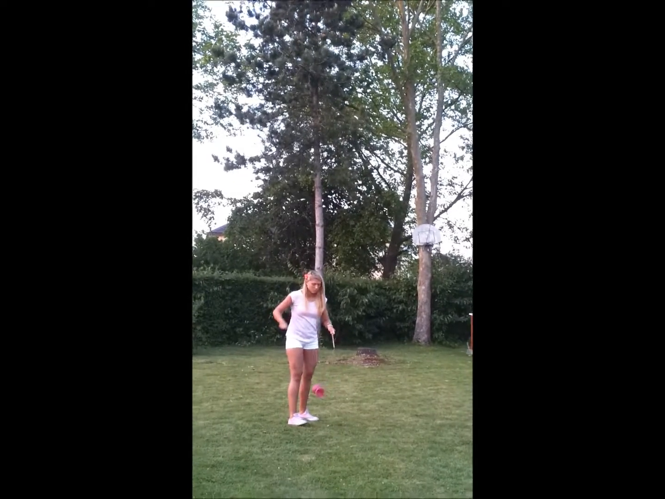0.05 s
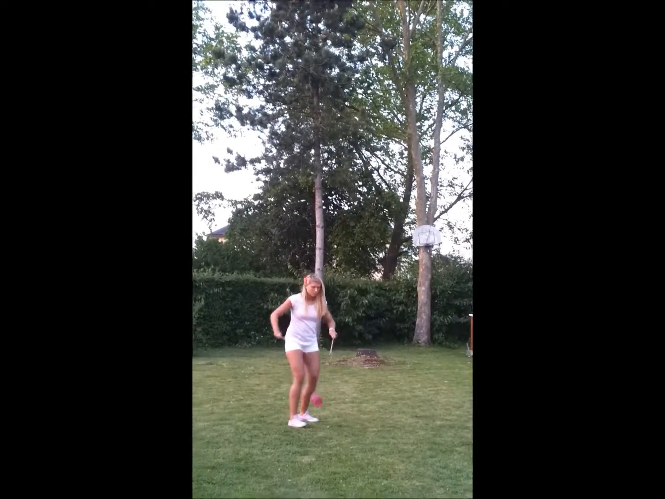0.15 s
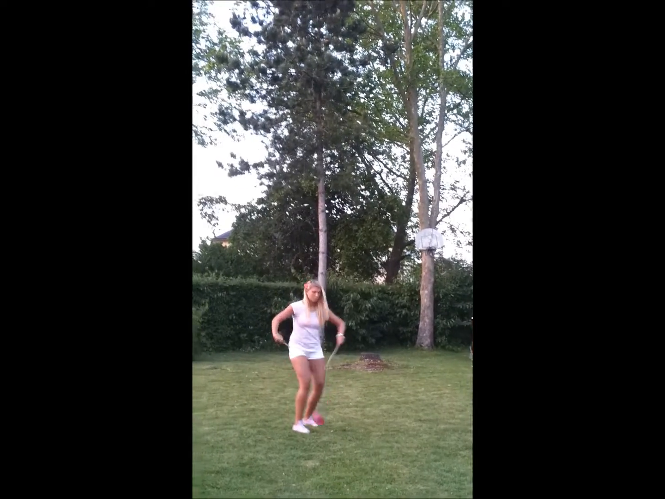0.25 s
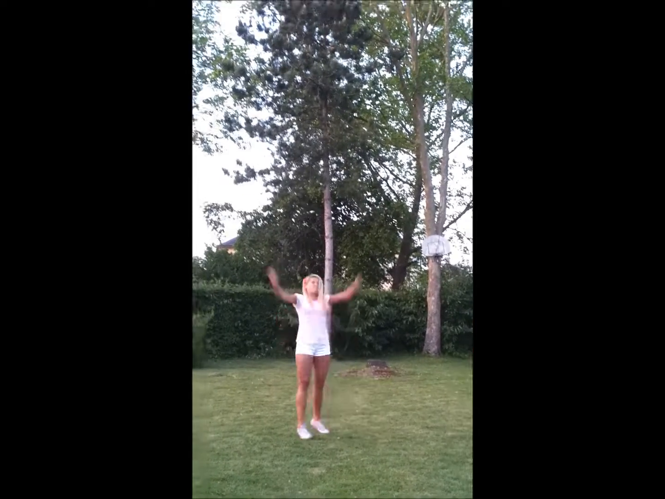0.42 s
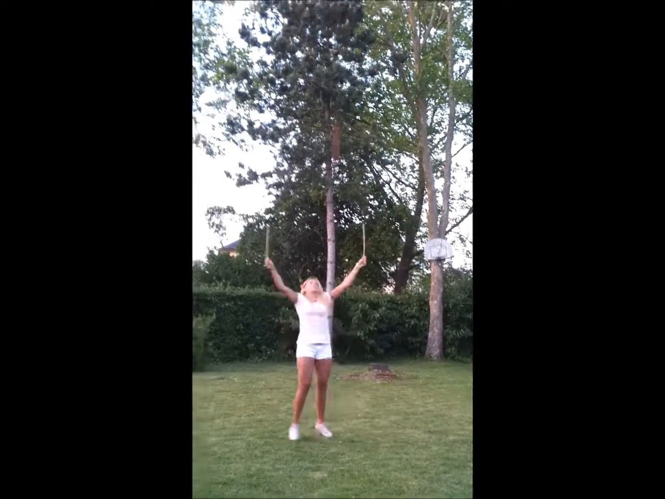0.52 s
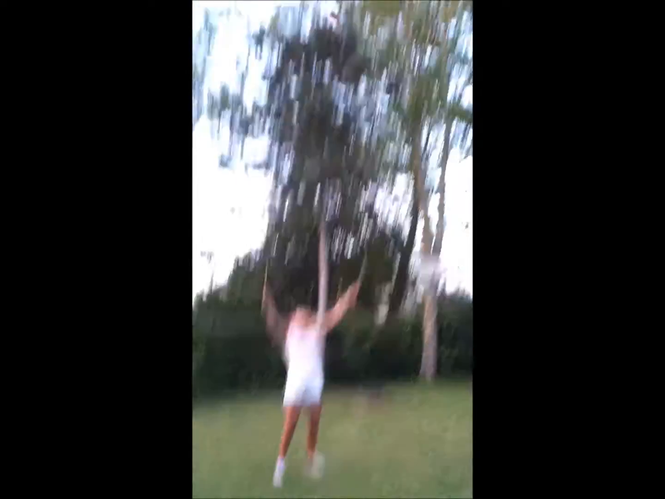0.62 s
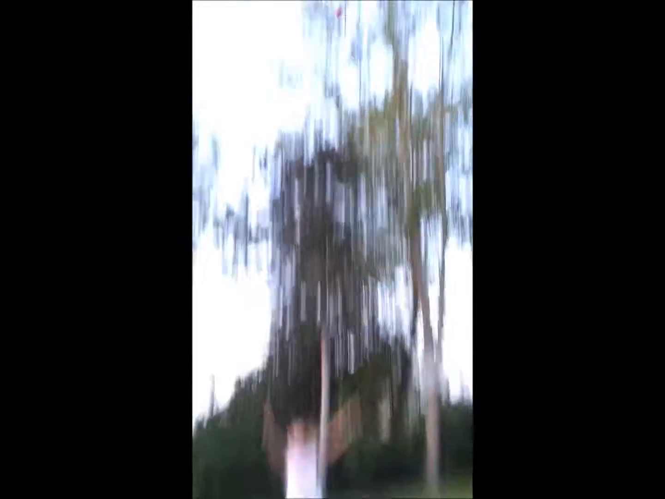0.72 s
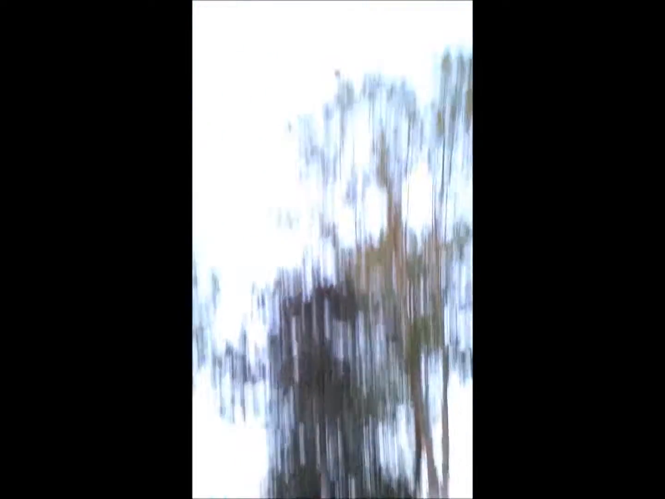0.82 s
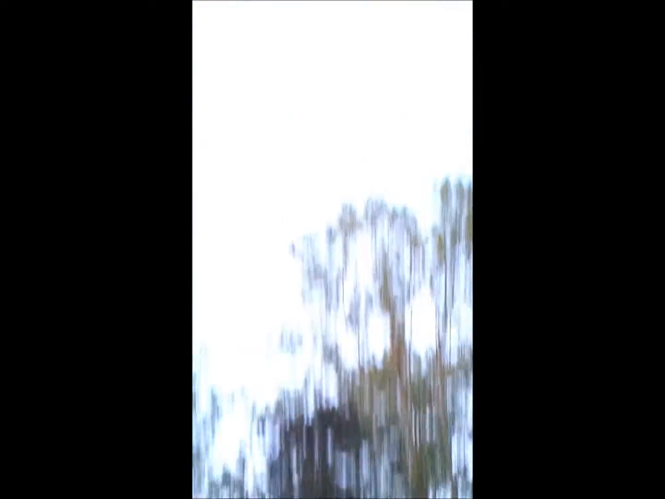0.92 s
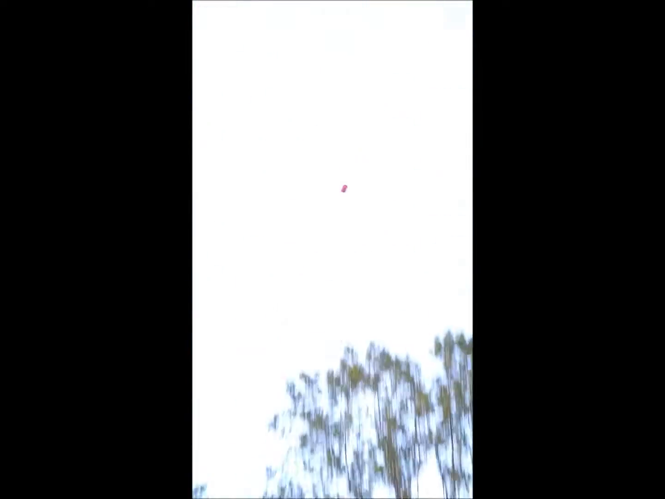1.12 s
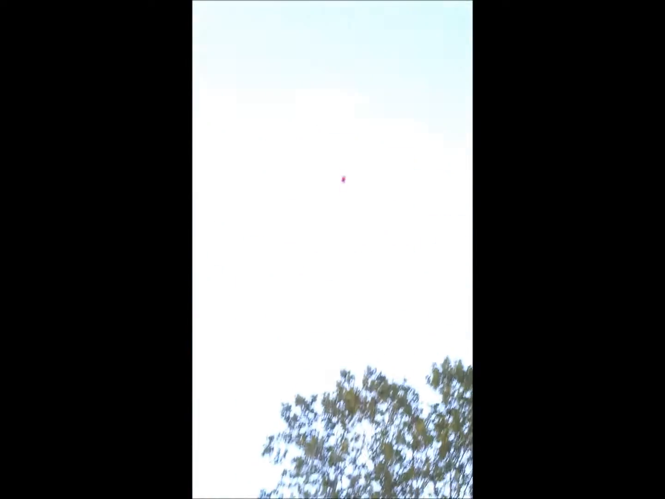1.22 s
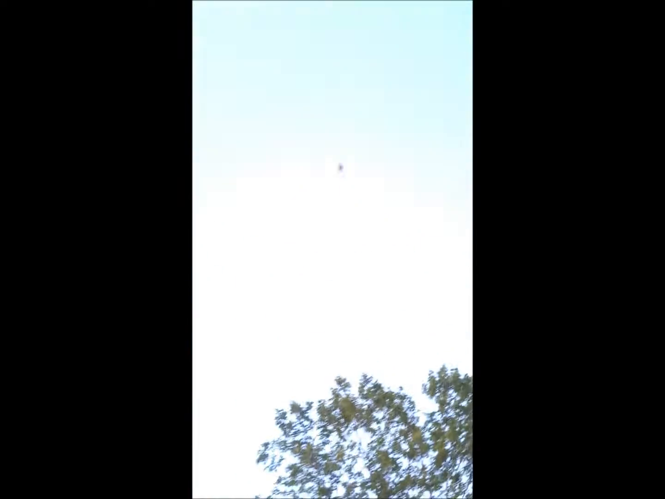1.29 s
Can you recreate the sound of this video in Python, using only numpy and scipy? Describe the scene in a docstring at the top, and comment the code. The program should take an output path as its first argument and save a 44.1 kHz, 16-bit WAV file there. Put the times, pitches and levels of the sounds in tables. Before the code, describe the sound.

A small bird whistles falling notes in a garden, with a brief knock on the microphone.

```python
"""A small warbler sings in a garden: evenly spaced whistles that fall in pitch, two kinds in turn,
scattered back by the trees. A second bird slurs faintly far off, over a soft wash of outdoor noise.
Close to the left microphone port a hand knocks on the casing, makes it tick, and slides over it:
the impacts excite damped vibrations, and the friction of the skin makes a thin hiss."""
import sys
import numpy as np
from scipy import signal
from scipy.fft import rfft, irfft
from scipy.io import wavfile
from scipy.ndimage import uniform_filter1d

SR = 44100
rng = np.random.default_rng(int(sys.argv[2]) if len(sys.argv) > 2 else 0)


def file_out(sig):
    """Save sig as 16-bit WAV at sys.argv[1]."""
    # one column per channel
    cols = np.atleast_2d(sig).T
    # limit, then scale
    lim = np.clip(cols, -1, 1)
    pcm = np.round(lim * 32767).astype(np.int16)
    wavfile.write(sys.argv[1], SR, pcm)


N = 59535
TIME = np.arange(N) / SR


def from_db(db):
    """Decibels to amplitude ratio."""
    return 10 ** (np.asarray(db) / 20)


def unit_rms(x):
    """Normalisation to an rms of 1."""
    return x / np.sqrt(np.mean(x ** 2) + 1e-20)


def in_time(rows):
    """Linear interpolation of a curve at every sample."""
    return np.interp(TIME, *np.transpose(rows))


def at_hz(points, hz):
    """Interpolation on a log-frequency axis."""
    point_hz, value = np.transpose(points)
    return np.interp(np.log(hz + 1), np.log(point_hz), value)


def pan(db):
    """Left and right gains for a level difference, left minus right."""
    return from_db(np.array([[.5], [-.5]]) * db)


def drift(rate_hz):
    """Random fluctuation: low-passed noise, rms 1."""
    pole = np.exp(-2 * np.pi * rate_hz / SR)
    return unit_rms(signal.lfilter([1], [1, -2 * pole, pole * pole], rng.standard_normal(2 * N))[N:])


def noise(spectrum):
    """Spectral shaping of two uncorrelated noise channels, rms 1."""
    gain = from_db(at_hz(spectrum, np.fft.rfftfreq(N, 1 / SR)))
    return unit_rms(irfft(rfft(rng.standard_normal((2, N))) * gain, N))


def decay(start, t60):
    """Exponential decay from a sudden onset, by 60 dB in t60 seconds."""
    return (TIME >= start) * from_db(-60 * np.clip((TIME - start) / t60, 0, 2))


def resonate(x, hz, width_hz):
    """A two-pole resonance with a peak gain of 1."""
    radius = np.exp(-np.pi * width_hz / SR)
    feedback = [1, -2 * radius * np.cos(2 * np.pi * hz / SR), radius ** 2]
    return signal.lfilter(np.array([1, 0, -1]) * (1 - radius ** 2) / 2, feedback, x + 1e-18)


def rolloff(x, kind, hz):
    """A second-order low-pass or high-pass filter."""
    return signal.sosfilt(signal.butter(2, hz, kind, fs=SR, output="sos"), x + 1e-18)


# Each row: frequency in Hz, relative spectral density in dB.
WASH_SPECTRUM = [(25, -19), (55, -6), (90, -5), (170, 1.5), (400, 4), (800, 1), (1300, 1.5), (2100, 0.5),
                 (2900, -8), (4200, -8.5), (6000, -12.5), (10000, -15.5), (14500, -17.5)]
# Each row: time in seconds, level in dB.
WASH_LEVEL = [(0, -49), (.3, -46.5), (.62, -47), (.85, -48), (1.05, -49.5), (1.15, -46.5), (1.35, -53)]
# Each row: frequency in Hz, left minus right in dB.
WASH_BALANCE = [(50, 7), (150, 5.5), (500, 1.5), (2000, -0.5), (12000, 1)]
# Each row: frequency in Hz, correlation between the channels.
WASH_CORRELATION = [(50, 0.4), (200, .45), (800, 0.43), (3000, 0), (12000, 0.63)]


def outdoor_wash():
    """Partial coherence: distant sound reaches the two channels only partly alike."""
    hz = np.fft.rfftfreq(N, 1 / SR)
    mid, side = rfft(noise(WASH_SPECTRUM))
    correlation = at_hz(WASH_CORRELATION, hz)
    spectra = np.sqrt(1 + correlation) * mid + np.sqrt(1 - correlation) * side * [[1], [-1]]
    wash = unit_rms(irfft(spectra * pan(at_hz(WASH_BALANCE, hz)), N))
    return wash * from_db(in_time(WASH_LEVEL) + .5 * drift(5))


# Each row: centre frequency in Hz, resonator bandwidth in Hz, level in dB.
HUM_BANDS = [(766, 180, -48.5), (936, 225, -49.5)]
# Each row: time in seconds, gain on both bands in dB.
HUM_GAIN = [(0, -4.5), (.4, -2), (.68, -3), (.95, -9), (1.35, -9)]


def hum():
    """Resonance narrows noise into bands, heard as a faint wavering hum."""
    out = 0
    for hz, width_hz, db in HUM_BANDS:
        band = resonate(rng.standard_normal((2, N)), hz, width_hz)
        out += from_db(db) * unit_rms(resonate(band, hz, width_hz))
    return out * from_db(in_time(HUM_GAIN))


# Near and far foliage. Each row: relative level in dB, 60 dB decay time in seconds.
FOLIAGE = [(0.5, 0.15), (-5, 0.67)]


def tree_echoes(x):
    """Scattering: trunks and leaves return countless weak echoes, different in each channel."""
    envelope = sum(from_db(db) * decay(0, t60) for db, t60 in FOLIAGE)
    response = unit_rms(rng.standard_normal((2, N)) * envelope) / np.sqrt(N)  # unit energy
    return signal.fftconvolve(rolloff(response, "low", hz=14800), x[None], axes=1)[:, :N]


# Each row: start and duration in seconds, first and last pitch in Hz, peak level in dB.
SLURS = [(0.105, .05, 3850, 3780, -58), (0.865, .05, 4020, 3960, -54), (0.955, .06, 3000, 2900, -56),
         (1.005, .05, 2550, 2200, -56), (1.245, .10, 2370, 1880, -52)]


def far_bird(echo_db=-11):
    """Frequency glides: soft pure tones swell and fade as they fall, and echo off the trees."""
    song = 0
    for start, duration, high_hz, low_hz, db in SLURS:
        progress = np.clip((TIME - start) / duration, 0, 1)
        hz = low_hz + (high_hz - low_hz) * (1 - progress) ** 1.49
        song += from_db(db) * np.sin(np.pi * progress) * np.sin(2 * np.pi * np.cumsum(hz) / SR)
    return song + from_db(echo_db) * tree_echoes(song)


# Each row: time in seconds, level in dB.
SLIDE_LEVEL = [(0, -71), (.15, -66.5), (.22, -48.5), (.33, -62), (.52, -53.5), (.8, -53), (1.05, -56),
               (1.2, -60), (1.35, -68.5)]
# Each row: start in seconds, level in dB, 60 dB decay time in seconds.
SCUFFS = [(0.154, -47, .025), (0.2145, -44, .015), (0.5145, -34, .035), (0.529, -41, .02),
          (0.9563, -37, .006), (1.086, -37, .015), (1.185, -43, .03)]
# Each row of both spectra: frequency in Hz, relative spectral density in dB.
SLIDE_SPECTRUM = [(200, -18), (2000, -6.5), (5500, -19), (8000, -2), (9900, 0.5), (10900, 2.5), (12000, -7),
                  (14500, -14.5)]
SCUFF_SPECTRUM = [(60, -48), (300, -4), (2000, 2.5), (5000, -6.5), (8000, -1.5), (11000, 2), (14500, -15)]


def sliding_hand():
    """Friction: skin rubs the casing with a thin grainy hiss and a few brief scuffs."""
    slide = from_db(in_time(SLIDE_LEVEL) + 1.1 * drift(90)) * noise(SLIDE_SPECTRUM)
    scuff_envelope = sum(from_db(db) * decay(start, t60) for start, db, t60 in SCUFFS)
    return slide * pan(db=6.5) + scuff_envelope * noise(SCUFF_SPECTRUM) * pan(db=5)


# Each row: start in seconds, peak level in dB, frequency in Hz, rise time in seconds,
# left minus right in dB.
TICKS = [(0.9564, -25, 9800, 0.00025, 16), (1.0848, -27, 8480, 0.00039, -2), (1.0865, -23, 8080, 0.0003, 3),
         (1.0959, -33, 11300, 0.00012, 21)]


def casing_ticks():
    """Modal ringing: each tiny contact excites one high mode for about a millisecond."""
    out = 0
    for start, db, hz, rise_s, pan_db in TICKS:
        age = np.maximum(TIME - start, 0)
        rise = np.minimum(age / rise_s, 20)
        envelope = from_db(db) * rise * np.exp(1 - rise)
        out += pan(pan_db) * envelope * np.sin(2 * np.pi * hz * age)
    return out


# Each row: start in seconds; the thump's level in dB, frequency in Hz and 60 dB decay time in
# seconds; the crack's level in dB and low-pass corner in Hz. Levels are before filtering.
KNOCKS = [(0.2066, -24, 380, 0.005, -19, 3040), (0.2366, -9, 404, 0.005, -10, 12200),
          (0.2530, 4.5, 575, 0.0092, -9, 3000), (0.29, -11, 261, 0.015, -24, 2000)]
# Each row: frequency in Hz, relative spectral density in dB.
CRACK_SPECTRUM = [(40, -47), (150, 5.5), (400, -28), (1400, -1.5), (2300, -2), (3000, 0), (4200, -18.5),
                  (6000, -8.5), (8500, -4.5), (11000, -13.5), (14500, -37)]


def casing_knocks(thump_right_db=-31, crack_right_db=-19.5):
    """Impact excitation: a damped thump of the casing and a short crack, nearly all in the left port."""
    thumps, cracks = 0, 0
    crack_noise = noise(CRACK_SPECTRUM)
    for start, thump_db, hz, t60, crack_db, corner_hz in KNOCKS:
        thumps -= from_db(thump_db) * decay(start, t60) * np.cos(2 * np.pi * hz * (TIME - start))
        burst = from_db(crack_db) * decay(start, t60=.0093) * crack_noise
        pole = np.exp(-2 * np.pi * corner_hz / SR)
        cracks += signal.lfilter([1 - pole], [1, -pole], burst)
    thumps = rolloff(thumps, "low", hz=1150)
    left = thumps + cracks[0]
    right = from_db(thump_right_db) * thumps + from_db(crack_right_db) * cracks[1]
    return rolloff(np.array([left, right]), "high", hz=157)


# Each row of both contours: time into the note in seconds at pace 1, pitch in Hz, relative level in dB.
DEEP_CONTOUR = [(0, 7400, -35), (.003, 7200, -12), (.008, 6950, 0), (.013, 5850, -2), (.019, 4800, -11),
                (.028, 4250, -9), (.04, 4120, -7), (.075, 4150, -14), (.093, 4180, -10), (.108, 3750, -17),
                (.124, 3700, -19), (.132, 3700, -50)]
SHALLOW_CONTOUR = [(0, 7200, -35), (.003, 7050, -10), (.009, 6300, 0), (.016, 5450, -5), (.023, 5200, -10),
                   (.034, 5020, 0), (.047, 4950, 0), (.062, 4750, -14), (.073, 4150, -10),
                   (.087, 3650, -11), (.112, 3550, -9), (.119, 3550, -45)]
# Each row: start in seconds, contour, pace as a speed ratio, base level in dB, tilt in dB per octave,
# echo gain in dB, left minus right in dB, right channel delay in seconds.
WARBLER_NOTES = [(-0.026, "shallow", .94, -41, 3, -2.5, -7.5, -.0001),
                 (0.3562, "deep", .9, -35, 7.5, 0, -1, -.00014),
                 (0.728, "shallow", 1, -38, 9, -2, 1, .00001),
                 (1.099, "deep", .97, -34, -2, -2, 2.5, .00016)]


def warbler(glide_s=.003, tilt_pivot_hz=5000, flutter_db=3.5, pitch_wobble=.0049):
    """Frequency modulation: each whistle falls fast, holds, then steps down; scattering smears it."""
    out = 0
    for start, kind, pace, base_db, tilt, echo_db, pan_db, delay_s in WARBLER_NOTES:
        times, pitches, levels = np.transpose(DEEP_CONTOUR if kind == "deep" else SHALLOW_CONTOUR)
        note_time = TIME * pace
        hz = uniform_filter1d(np.interp(note_time, times, pitches), int(glide_s * SR))
        db = base_db + np.interp(note_time, times, levels) + tilt * np.log2(hz / tilt_pivot_hz)
        envelope = from_db(db + flutter_db * drift(90)) * (note_time < times[-1])
        phase = 2 * np.pi * np.cumsum(hz * (1 + pitch_wobble * drift(126))) / SR
        direct = pan(pan_db) * envelope * np.sin([phase, phase - 2 * np.pi * hz * delay_s])
        echoes = from_db(echo_db) * tree_echoes(envelope * np.sin(phase))
        offset = N - int(start * SR)  # shifts the note to its start, which may be negative
        out += np.pad(direct + echoes, [(0, 0), (N, N)])[:, offset:offset + N]
    return out


def scene():
    """Superposition: the birds, the garden and the nearby hand add together."""
    garden = warbler() + far_bird() + outdoor_wash() + hum()
    return garden + casing_knocks() + casing_ticks() + sliding_hand()


def record(dry, cutoff_hz=14700):
    """Clipping and band limiting: the signal is held to full scale, then steeply low-passed."""
    low_pass = signal.ellip(10, .2, 70, cutoff_hz, fs=SR, output="sos")
    return signal.sosfilt(low_pass, np.clip(dry, -1, 1))


dry = scene()
out = record(dry)
file_out(out)
```